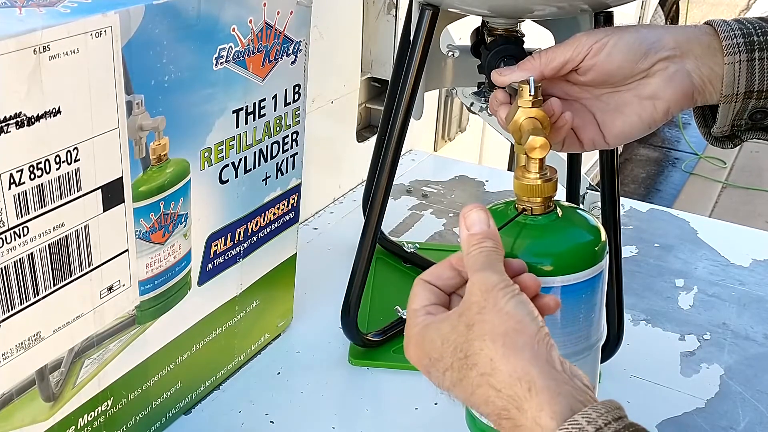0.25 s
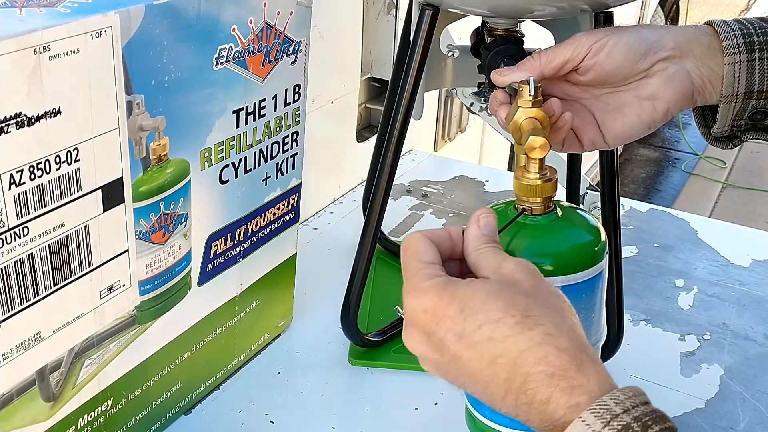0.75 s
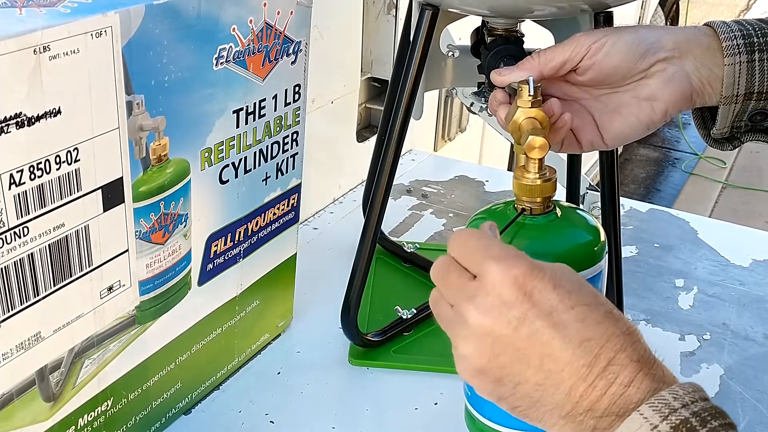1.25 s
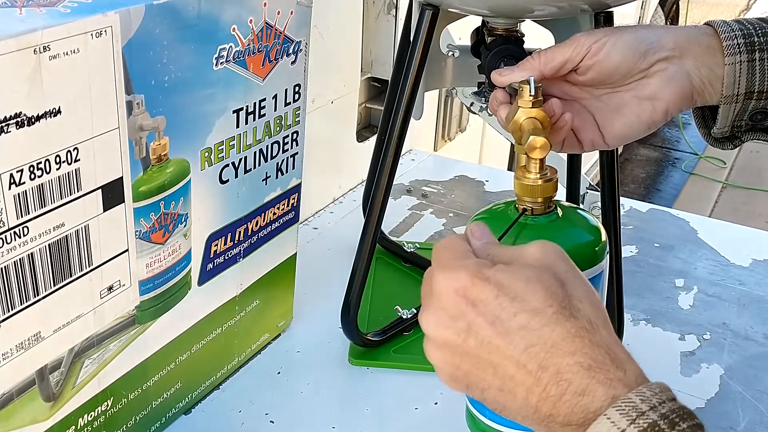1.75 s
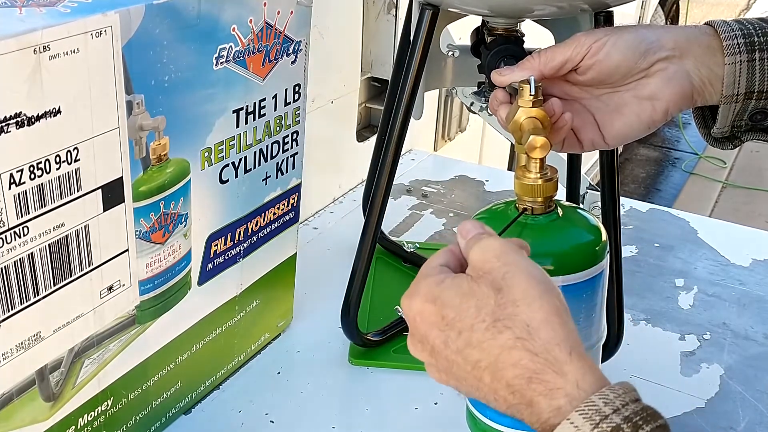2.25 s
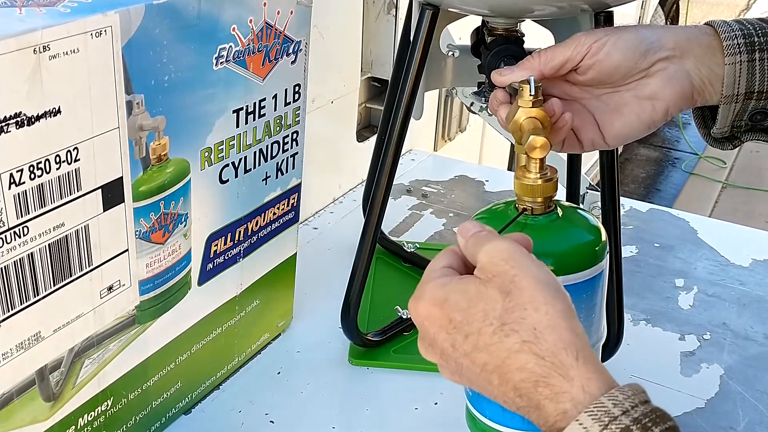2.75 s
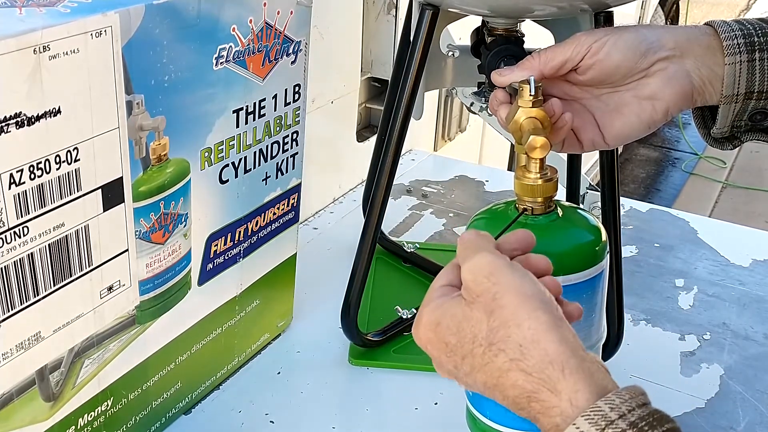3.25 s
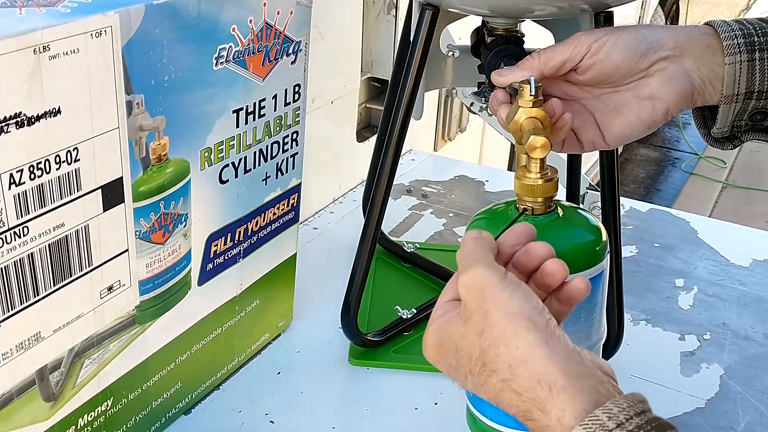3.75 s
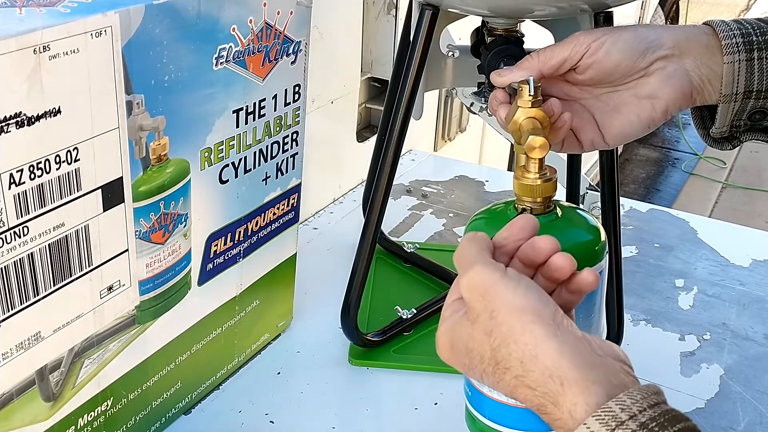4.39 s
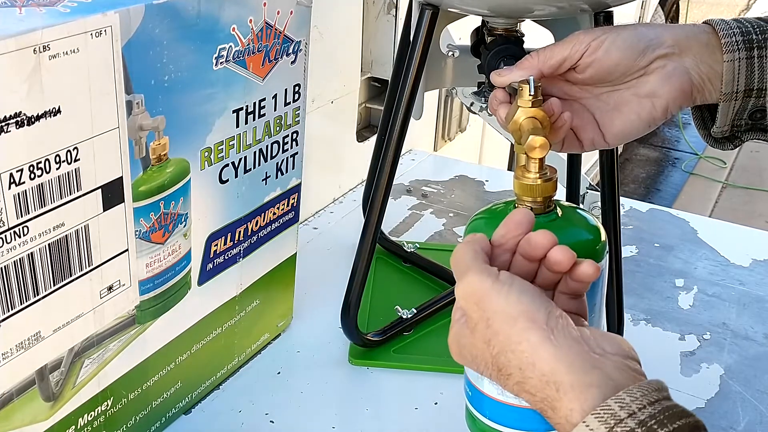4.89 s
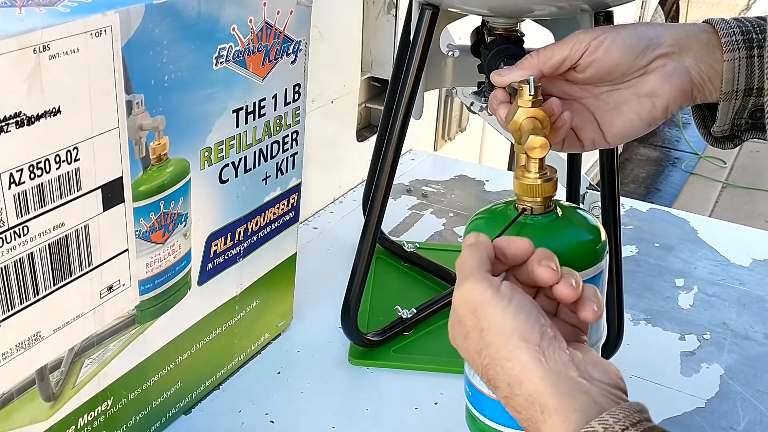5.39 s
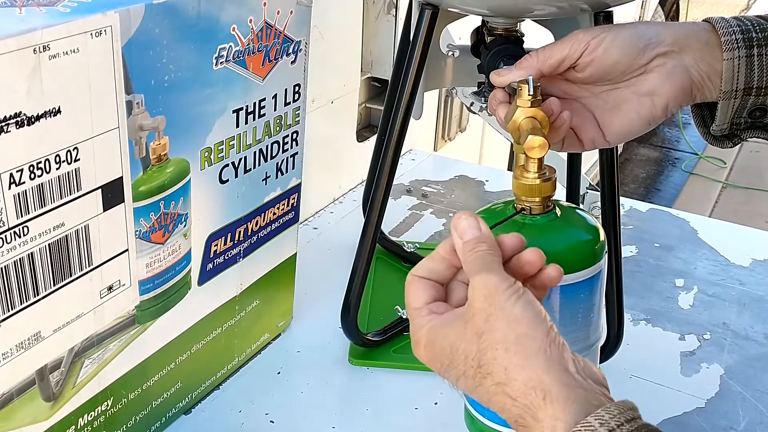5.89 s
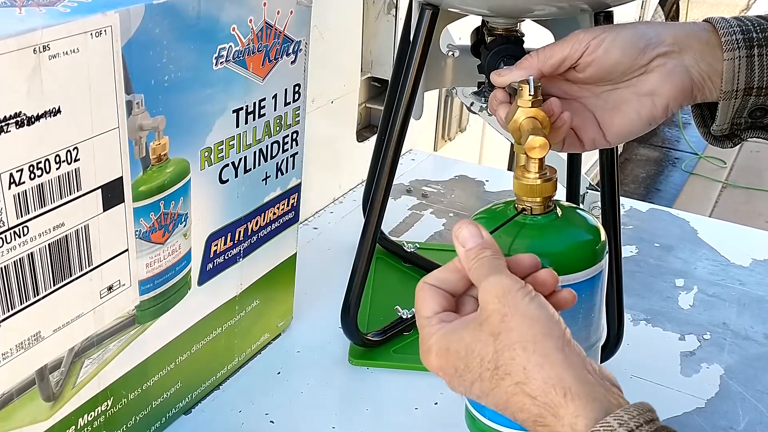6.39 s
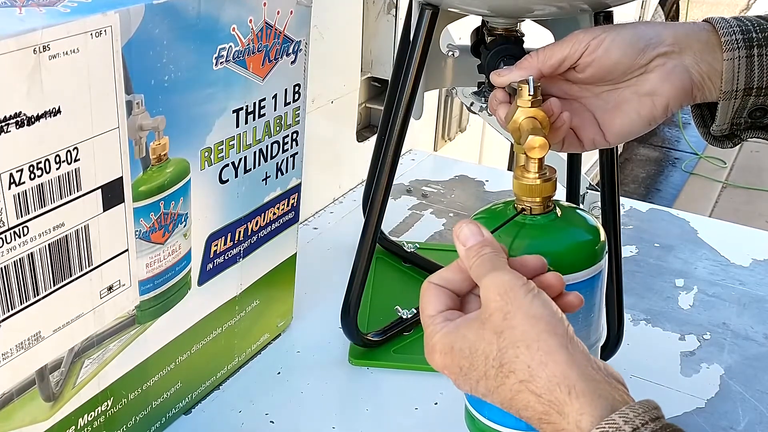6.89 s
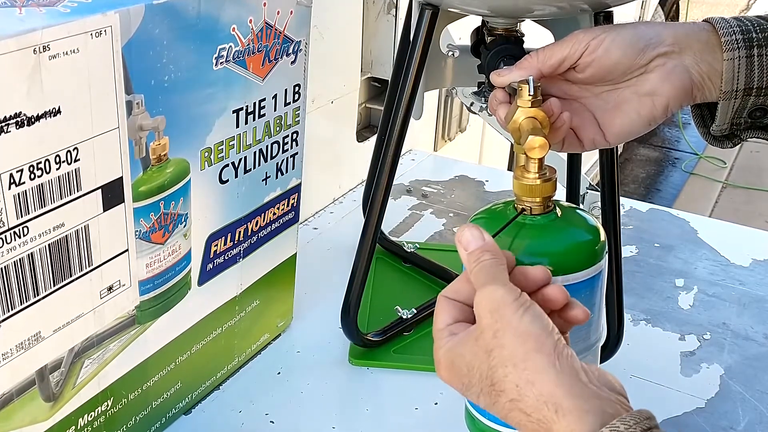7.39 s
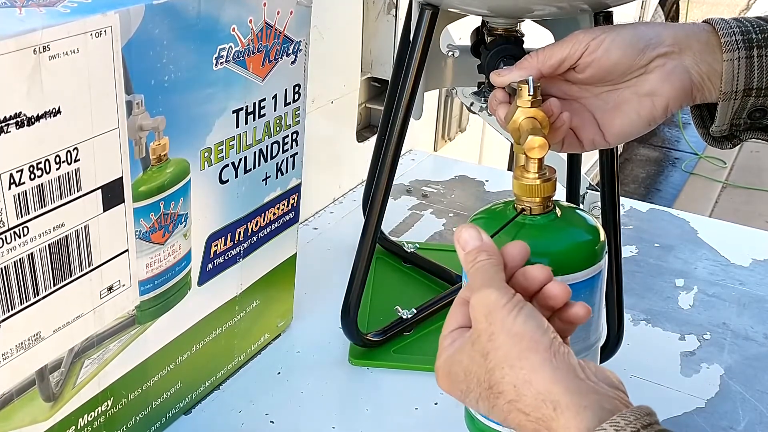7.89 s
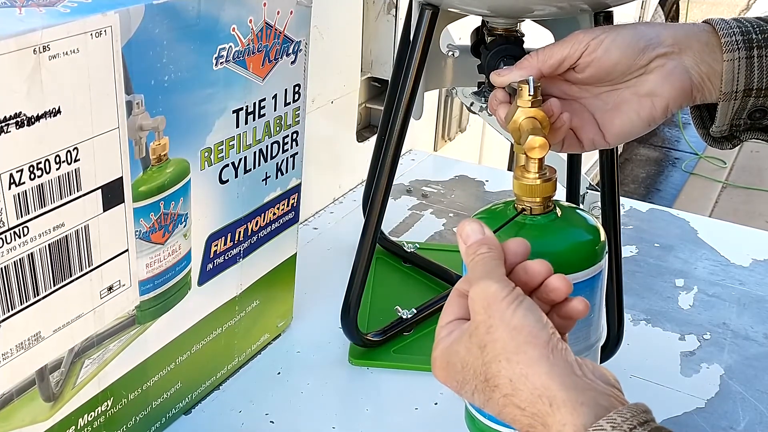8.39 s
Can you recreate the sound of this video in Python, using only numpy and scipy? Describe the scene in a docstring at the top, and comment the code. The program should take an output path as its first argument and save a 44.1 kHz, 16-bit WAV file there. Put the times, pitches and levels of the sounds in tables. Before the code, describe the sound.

Loud close gas hiss from a small cylinder is shut off, faint flow dies away, then the hiss slowly reopens into a roaring jet that spits once.

```python
"""Propane vapour hisses from a small steel cylinder's bleed screw, an arm's length from the microphones.
A hand shuts the screw, then eases it open until the jet roars again and spits once.
Hiss, channel tones and roar are coloured noise, all set by one screw gap; the spit is a noise burst.
In the pause gas from a big tank runs through the brass filler: fading noise.
Behind lie outdoor rumble (noise) and a distant machine hum (two wavering sines)."""
import sys
import numpy as np
from scipy import signal
from scipy.fft import rfft, irfft
from scipy.io import wavfile

SR = 44100
rng = np.random.default_rng(int(sys.argv[2]) if len(sys.argv) > 2 else 0)


def materialize(psi):
    """Save the field psi as 16-bit PCM at rate SR to the path in sys.argv[1].

    A 1-D psi becomes a single channel; in a 2-D psi each row is a channel.
    """
    bounded = np.clip(np.atleast_2d(psi).T, -1, 1)
    quanta = np.round(bounded * 32767).astype(np.int16)
    wavfile.write(sys.argv[1], SR, quanta)


N = 381024
TIME_S = np.arange(N) / SR
FREQ_HZ = np.arange(N // 2 + 1) * SR / N


def undb(db):
    """Decibels to amplitude gain."""
    return 10 ** (np.asarray(db) / 20)


def contour(rows):
    """Each column of a table interpolated over log frequency."""
    hz, *columns = np.transpose(rows)
    return np.array([np.interp(np.log(FREQ_HZ + 1), np.log(hz), column) for column in columns])


def walk(rate_hz):
    """Smooth random drift: noise under a Gaussian low-pass, zero mean, spread 1."""
    drift = irfft(rfft(rng.standard_normal(N)) * np.exp(-(FREQ_HZ / rate_hz) ** 2), N)
    return (drift - drift.mean()) / drift.std()


def turbulence(gain, likeness, left_lag_s=0):
    """Coloured stereo noise of rms 1, partly shared by the two microphones."""
    shared, *own = rfft(rng.standard_normal((3, N)))
    share = np.clip(contour(likeness), 0, 1)
    shared_left = shared * np.exp(-2j * np.pi * FREQ_HZ * left_lag_s)
    direct = np.array([shared_left, shared])
    mixed = np.sqrt(share) * direct + np.sqrt(1 - share) * np.array(own)
    noise = irfft(gain * mixed, N)
    return noise / noise.std()


def ringing(modes):
    """Gain of independently stirred resonances, summed in power."""
    power = sum(undb(level_db) ** 2 / (1 + ((FREQ_HZ - hz) / width_hz * 2) ** 2) ** 1.36
                for hz, width_hz, level_db in modes)
    return np.sqrt(power)


def reflections(strength, spread_s, count=40):
    """Weak early echoes off table, carton and tank comb the sound, differently per microphone."""
    response = np.zeros((2, N))
    for side in response:
        delay_s = spread_s * (.5 + rng.exponential(size=count))
        side[(delay_s * SR).astype(int)] = strength * rng.standard_normal(count) / np.sqrt(count)
    response[:, 0] = 1  # direct sound
    return rfft(response)


# hand on the bleed screw, shutting then opening: time_s, gap (share of fully open)
SCREW_GAP = [(.25, 0.88), (.55, 0.38), (.6, 0.11), (.645, 0.036), (.75, 0.015), (.795, 0.00052), (1.835, 0),
             (2.1, .018), (2.33, .046), (2.44, 0.11), (3.0, 0.12), (3.4, 0.24), (5.8, 0.65)]


def screw_gap_db():
    """Gap under the screw, dB re fully open, floored at -120 dB."""
    time_s, gap = np.transpose(SCREW_GAP)
    return 20 * np.log10(np.maximum(np.interp(TIME_S, time_s, gap), 1e-6))


# asymptotic level with no screw in the way; gap (share of fully open) that halves the power
CHOKED_DB, CHOKE_GAP = -20, 0.26


def flow(gap_db):
    """Flow level in dB: grows with the gap until the narrow channel behind the screw chokes it."""
    return CHOKED_DB - 10 * np.log10(1 + (CHOKE_GAP / undb(gap_db)) ** 2)


# jet colour: freq_hz, left_db, right_db
JET_COLOUR = [(99.8, -50, -56.5), (802, -46, -43.5), (1430, -40.5, -38), (2050, -17.5, -39.5),
              (2240, -29, -43), (3060, -16.5, -17.5), (3820, -11, -13.5), (6000, -11.5, -4.5),
              (7420, -2.5, -2), (8900, -5.5, -0.5), (11800, -5, -10.5), (15500, -7, -8)]
# peaks and dips of the nook between cylinder, hand and carton: freq_hz, width_hz, left_db, right_db
NOOK_MODES = [(3157, 174, -7.5, -5), (3572, 81, -16.5, -7.5), (4900, 180, 5, -4.5), (5855, 390, 5, 1.8),
              (6470, 180, 4.5, -0.3), (7170, 86, 3.5, 4.5), (7596, 49, -13.5, 7.5), (8160, 130, 3.5, -0.1),
              (8870, 240, 4, 1.5), (9930, 300, 2, 1.5), (10760, 250, 1.5, -7), (11760, 260, -1, -1),
              (12490, 380, -7, -2.5), (12730, 170, 8.5, -1.5), (13400, 580, 4, 2.5), (15570, 190, 5.5, 2)]
# jet likeness at the two microphones: freq_hz, coherence (0-1)
JET_COHERENCE = [(500, 0.94), (2000, 0.92), (4000, 0.51), (6000, 0.2), (10000, 0.54), (13000, 0.14),
                 (15000, .4)]
JET_LEFT_LAG_S = 2.3e-5
ECHO_STRENGTH = .21


def jet(flow_db):
    """Hiss of the narrow gap, coloured by the nook; its fine combing shifts as the hand moves."""
    nook_db = sum(np.outer([left_db, right_db], np.exp(-((FREQ_HZ - hz) / width_hz) ** 2))
                  for hz, width_hz, left_db, right_db in NOOK_MODES)
    colour = undb(contour(JET_COLOUR) + nook_db)
    spectrum = rfft(turbulence(colour, JET_COHERENCE, JET_LEFT_LAG_S))
    spectrum = spectrum * reflections(ECHO_STRENGTH, spread_s=.008, count=120)
    before = irfft(spectrum * reflections(ECHO_STRENGTH, spread_s=.003), N)
    after = irfft(spectrum * reflections(ECHO_STRENGTH, spread_s=.003), N)
    hand = np.clip(TIME_S / TIME_S[-1] + 0.071 * walk(1.2), 0, 1)
    hiss = (1 - hand) * before + hand * after
    # a nearly shut gap makes smaller eddies: the hiss thins from below
    thin = irfft(rfft(hiss) / (1 + (5000 / (FREQ_HZ + 1)) ** 5), N)
    openness = np.clip((flow_db + 39.0) / 13, .5, 1)
    blend = openness * hiss + (1 - openness) * undb(1.5) * thin
    return blend * undb(flow_db + 3.0)


# pipe tones of the screw's channel: freq_hz, width_hz, level_db (re flow level)
CHANNEL_TONES = [(1940, 180, -37.5), (3120, 460, -30.5), (3970, 210, -21.5), (5080, 290, -20.5),
                 (6000, 300, -12.5), (6946, 160, -7.5), (9400, 100, -23.5)]


def channel(flow_db, drowned_db=-19.5, range_db=5.5):
    """The screw's channel sings breathily, fading as flow_db rises towards drowned_db."""
    tones = sum(undb(level_db) * turbulence(ringing([(hz, width_hz, 0)]), JET_COHERENCE, JET_LEFT_LAG_S)
                for hz, width_hz, level_db in CHANNEL_TONES)
    clarity = np.clip((drowned_db - flow_db) / range_db, 0, 1)
    return tones * clarity * undb(flow_db + 1.0 * walk(6))


# roar resonances: freq_hz, width_hz, level_db
ROAR_RESONANCES = [(120.4, 83, -6), (421, 36, -6), (544, 167, -2), (636, 76, -8), (1016, 138, -3),
                   (1370, 590, -5), (1915, 410, 1.5), (2508, 190, 2.5), (2800, 89, 6.5), (3070, 81, 5.5),
                   (3370, 127, 4.5)]
# deep rumble resonances: freq_hz, width_hz, level_db
RUMBLE_RESONANCES = [(75, 45, -0.5), (122.1, 27, -5.5), (238, 31, 7), (300, 25, 0)]
# likeness of low and diffuse sound at the two microphones: freq_hz, coherence (0-1)
LOW_COHERENCE = [(60, .92), (300, .92), (640, .7), (900, .3), (1500, .55), (3000, .35), (8000, .1)]
# mean rumble level fully open; growth in dB per dB of gap
RUMBLE_DB, RUMBLE_GROWTH = -52.5, 1.1


def roar(flow_db, gap_db, full_db=-21.5, steepness=2.7):
    """Large eddies ring the hollows round the valve, steeper with flow than hiss; rumble tracks gap."""
    drive_db = steepness * np.minimum(flow_db - full_db, 0.4)
    upper_db = drive_db - 43.0 + .5 * walk(9)
    upper = turbulence(ringing(ROAR_RESONANCES), LOW_COHERENCE) * undb(upper_db)
    lower_db = RUMBLE_DB + RUMBLE_GROWTH * gap_db + 1.0 * walk(8)
    lower = turbulence(ringing(RUMBLE_RESONANCES), LOW_COHERENCE) * undb(lower_db)
    return upper + lower


def rush(envelope, colour):
    """Broad gas noise under an envelope."""
    return turbulence(undb(contour(colour)), LOW_COHERENCE) * envelope


# spit colour: freq_hz, level_db
SPIT_SPECTRUM = [(100, -23), (250, -1), (700, -4), (1000, -0.5), (2000, 0), (4500, 8.5), (7000, 10.5),
                 (15000, -9)]
SPIT_START_S, SPIT_DB = 7.583, -24.5
SPIT_ATTACK_S, SPIT_HOLD_S, SPIT_T60_S = 0.015, 0.043, 0.18


def spit():
    """A drop of liquid sputters through the screw: linear attack, hold, exponential release."""
    age_s = TIME_S - SPIT_START_S
    attack = np.clip(age_s / SPIT_ATTACK_S, 0, 1)
    release_s = np.maximum(age_s - SPIT_ATTACK_S - SPIT_HOLD_S, 0)
    release = np.exp(-np.log(1000) * release_s / SPIT_T60_S)
    return rush(undb(SPIT_DB) * attack * release, SPIT_SPECTRUM)


# filler colour: freq_hz, level_db
FILLER_SPECTRUM = [(150, 3), (500, 0.5), (750, -1.5), (1000, -1), (1600, -2), (2300, 2.5), (3000, -1.5),
                   (7500, -2), (11000, -9.5), (15500, -14.5)]
# level at first; time at which pressures are even; fade exponent
FILLER_DB, EVEN_S, FILLER_FADE = -54.5, 1.88, 2.12


def filler():
    """Gas runs through the brass filler and dies away as the pressures even out."""
    pressure = np.maximum(1 - TIME_S / EVEN_S, 0)
    return rush(undb(FILLER_DB) * pressure ** FILLER_FADE, FILLER_SPECTRUM)


# outdoor background colour: freq_hz, level_db
OUTDOOR_COLOUR = [(20, -14), (45, -12), (75, 3.5), (130, 0), (200, -14), (400, -18.5), (900, -19.5),
                  (1500, -26), (3500, -32), (9000, -28), (15000, -38)]
# far machine hum: pitch_hz, level_db (mean rms)
HUM_TONES = [(65, -71), (699, -87)]


def outdoors():
    """Distant noise with a drifting level, plus far machine hum wavering in pitch and level."""
    rumble = turbulence(undb(contour(OUTDOOR_COLOUR)), LOW_COHERENCE) * undb(-67.0 + 1.2 * walk(3))
    hum = 0
    for pitch_hz, level_db in HUM_TONES:
        amplitude = np.sqrt(2) * undb(level_db + 1.5 * walk(2))
        phase = 2 * np.pi * np.cumsum(pitch_hz + 0.59 * walk(3)) / SR
        hum = hum + amplitude * np.sin(phase)
    return rumble + hum


def scene():
    """The screw gap sets one slightly unsteady flow driving hiss, channel tones and roar."""
    gap_db = screw_gap_db()
    flow_db = flow(gap_db) + 0.43 * walk(22)
    bleed = jet(flow_db) + channel(flow_db) + roar(flow_db, gap_db)
    return bleed + spit() + filler() + outdoors()


TOP_HZ = 15760


def record(dry):
    """Steep elliptic low-pass at TOP_HZ: 0.1 dB ripple, 80 dB stopband."""
    return signal.sosfilt(signal.ellip(12, .1, 80, TOP_HZ, fs=SR, output="sos"), dry)


dry = scene()
out = record(dry)
materialize(out)
```